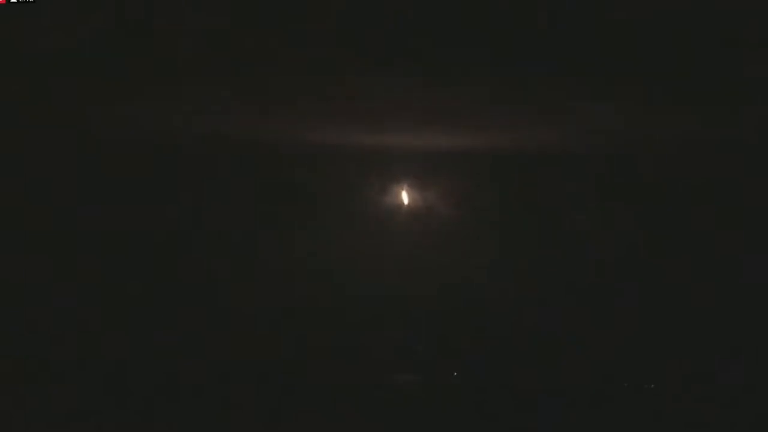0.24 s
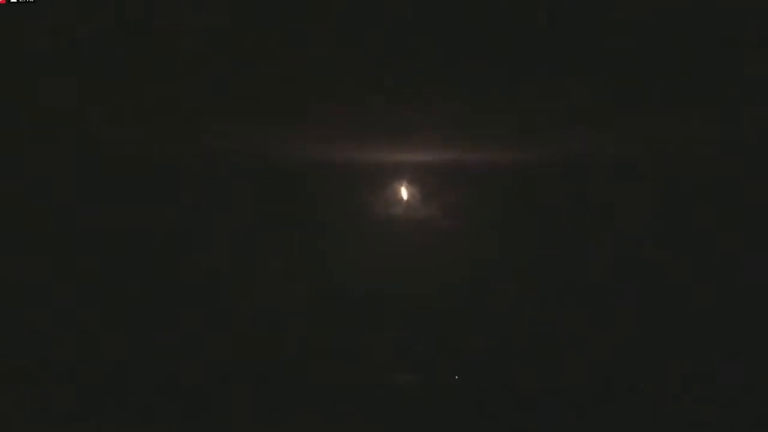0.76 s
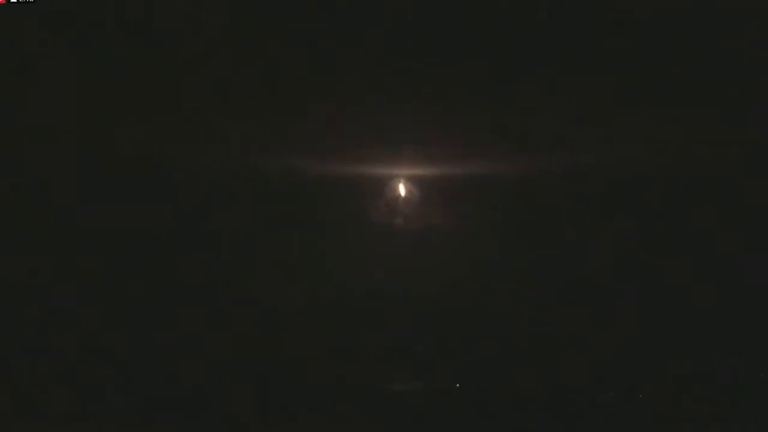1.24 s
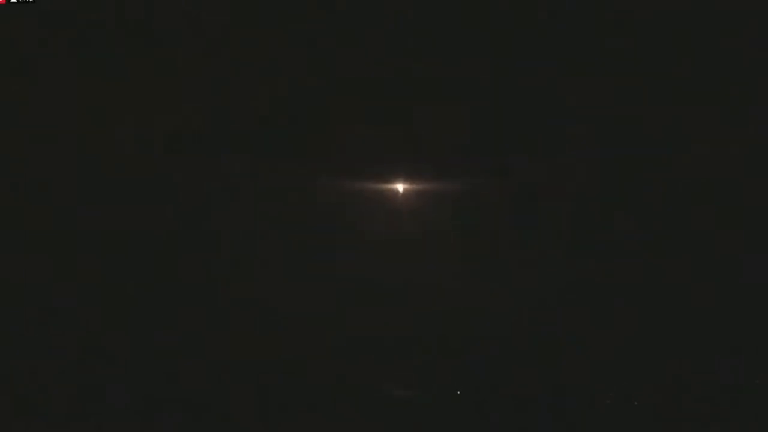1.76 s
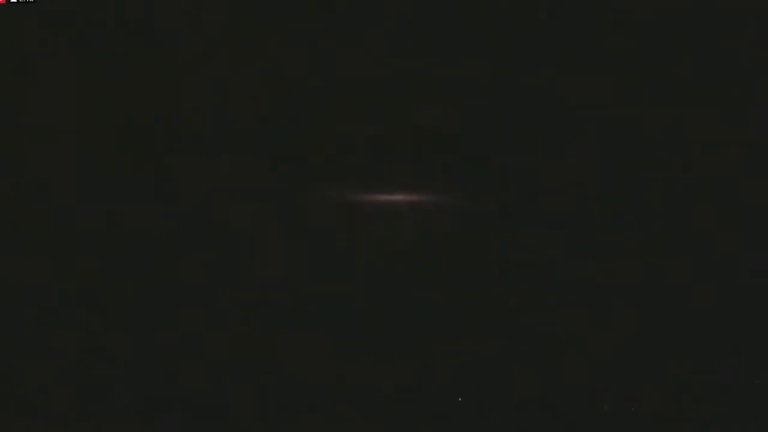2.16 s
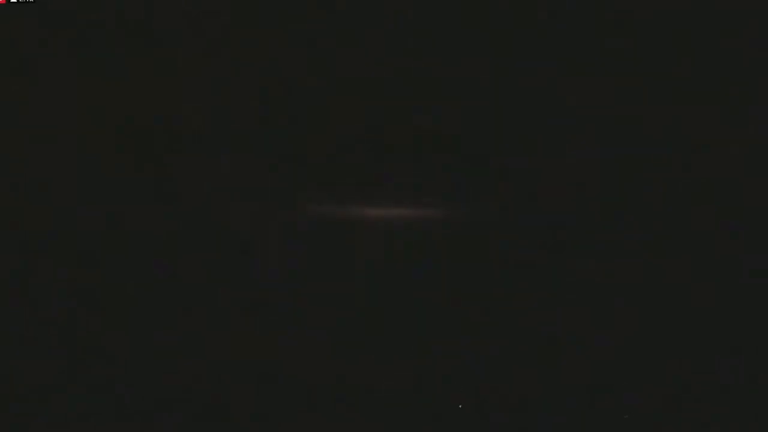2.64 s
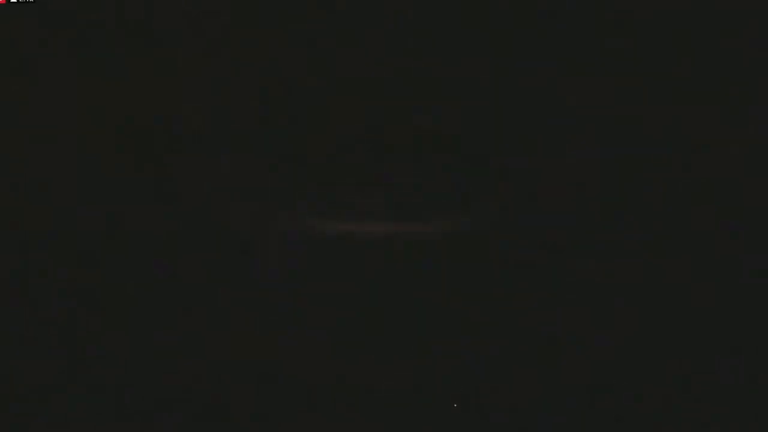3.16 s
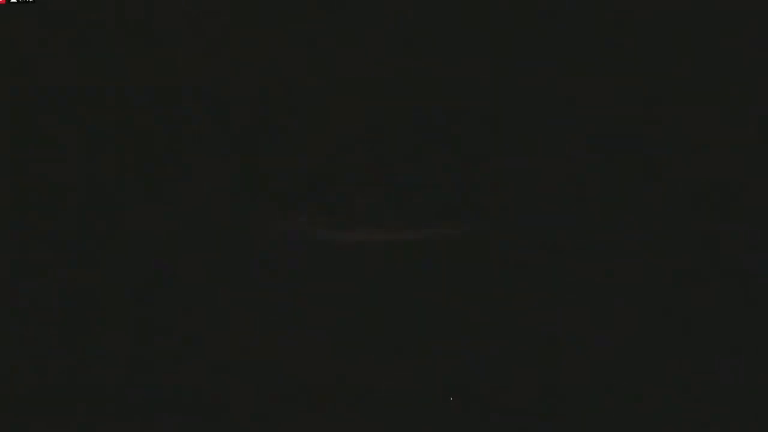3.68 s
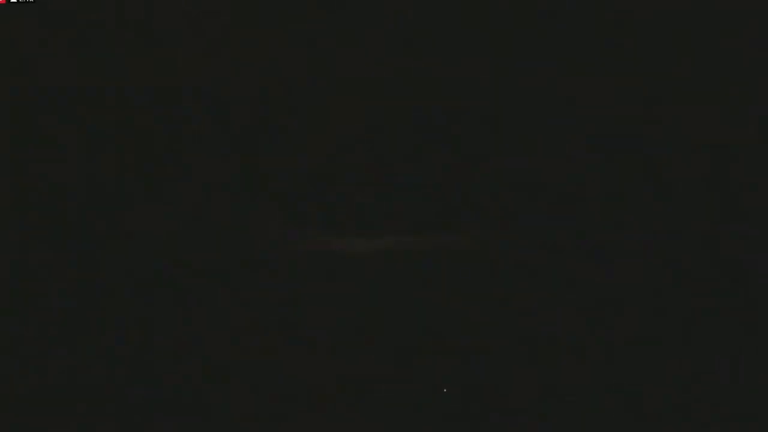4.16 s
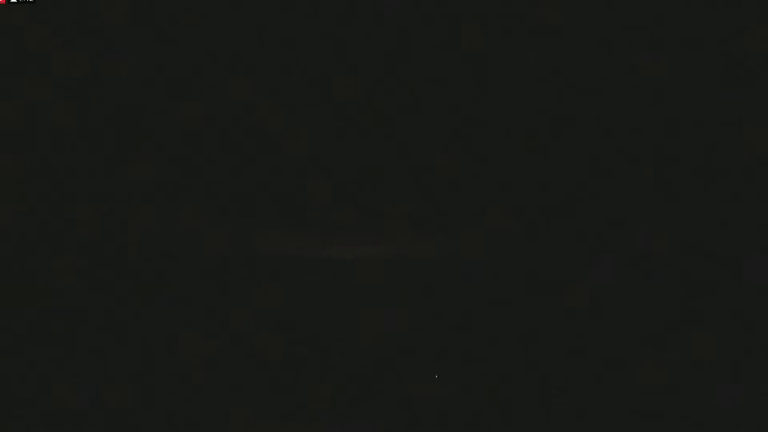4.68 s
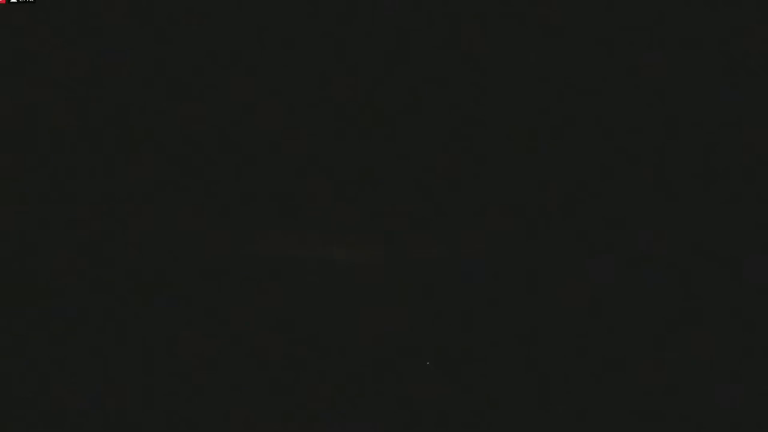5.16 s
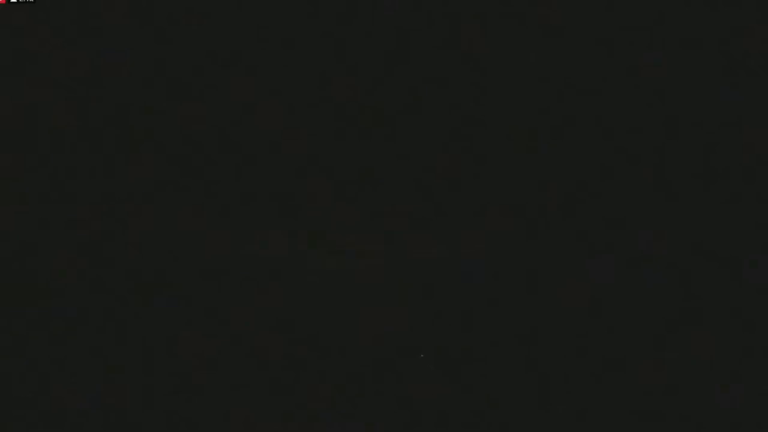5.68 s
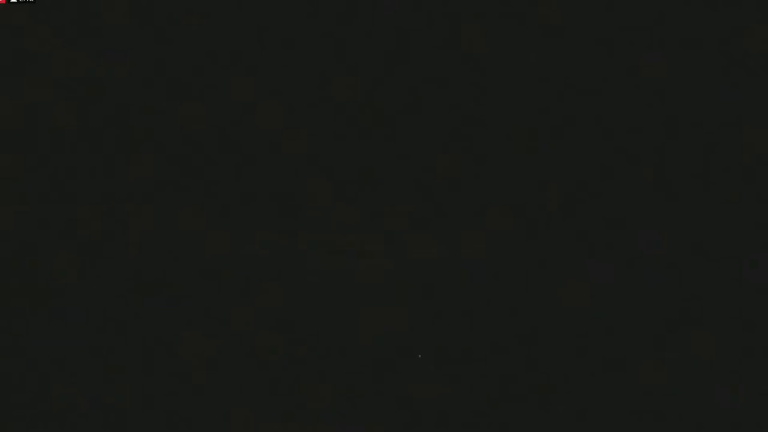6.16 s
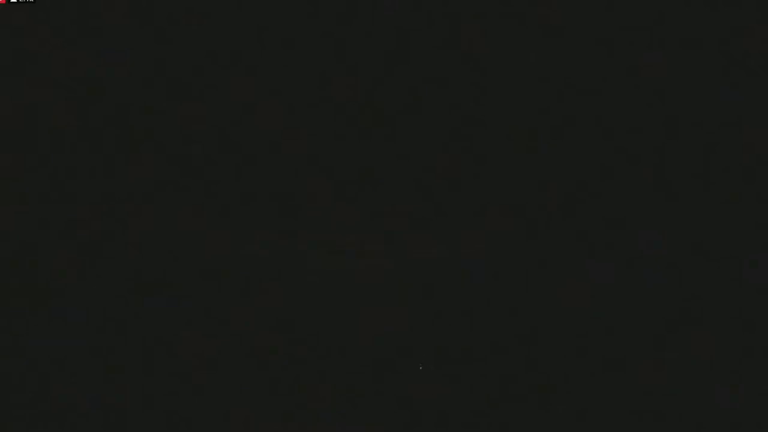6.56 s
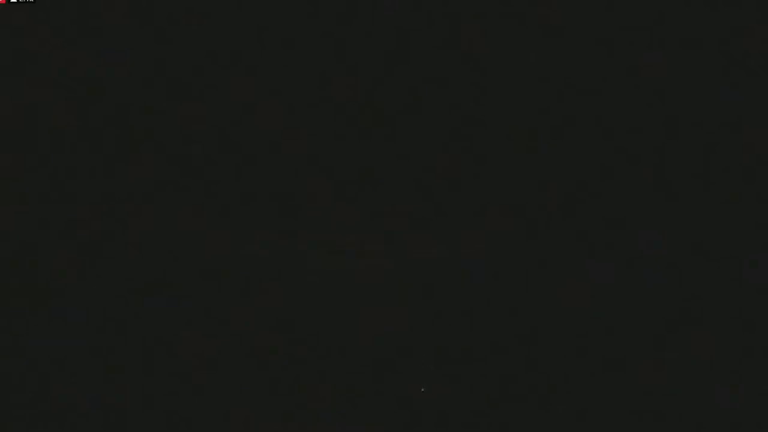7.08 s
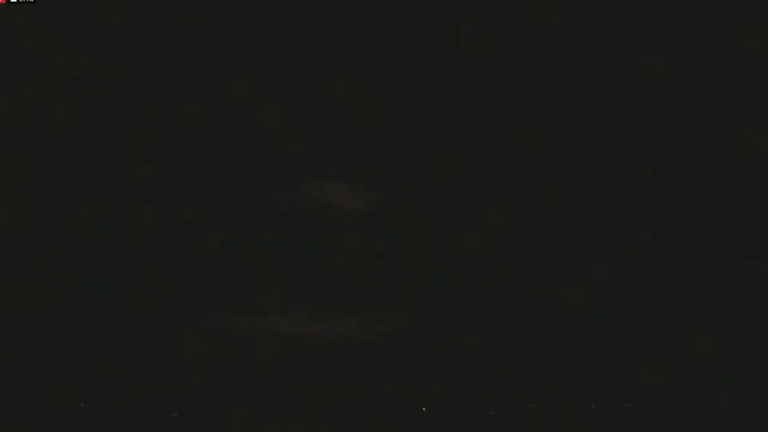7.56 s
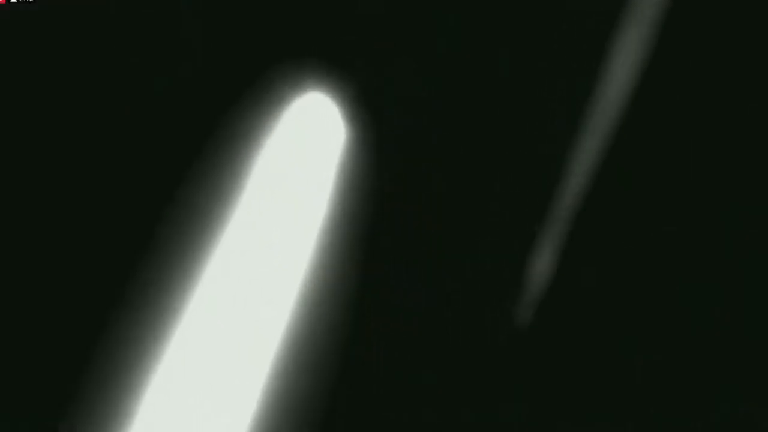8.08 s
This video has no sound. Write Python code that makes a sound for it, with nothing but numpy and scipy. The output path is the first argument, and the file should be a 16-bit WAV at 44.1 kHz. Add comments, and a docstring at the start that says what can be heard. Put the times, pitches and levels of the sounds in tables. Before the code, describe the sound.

Outdoors at night, a far rocket motor rumbles low and uneven, growing steadily until the end. Near the microphone, a thin, resonant roar and grainy rustle with small snaps come first, then three very faint high squeaks and sparse bright ticks. A katydid rasps one rapid buzzing phrase past the middle. Ticks, faint swishes and knocks return under the heaviest thumps.

```python
"""From the start a thin roar, noise shaped by the microphone's resonance, and a close rustle of grains and snaps.
A far solid rocket motor climbs into the night: noise and thumps of a few cycles make a lumpy, growing rumble.
Dull knocks, three squeaks (1.0-1.6 s), then swishes and ticks are tones, noise bands and struck resonances.
A katydid's wing resonances rasp one phrase (4.7-6 s) over hiss, a buzz of high partials and short sine pips.
Swishes, ticks and knocks return as the rumble grows to the end; faint even hiss and two whines never stop."""
import sys
import numpy as np
from scipy import signal
from scipy.io import wavfile
from scipy.ndimage import uniform_filter1d

SR = 44100
rng = np.random.default_rng(int(sys.argv[2]) if len(sys.argv) > 2 else 0)


def wav_out(sig):
    """Save sig, one row per channel (or a flat mono array), as 16-bit PCM at SR to the path in sys.argv[1]."""
    wavfile.write(sys.argv[1], SR, np.round(np.clip(np.atleast_2d(sig).T, -1, 1) * 32767).astype(np.int16))


N = 367353
TIME = np.arange(N) / SR

# Upper limits of the three lower frequency ranges of the rumble: f/Hz
RANGE_TOPS_HZ = 60, 125, 260
# Range levels of the jet noise: t/s, then level/dB of 60-125 Hz, below 60 Hz, 125-260 Hz, above 260 Hz
RUMBLE_LEVELS = [(0, -52, -61, -50.5, -58.5), (0.3, -51.5, -50, -51, -54), (0.5, -45, -39, -41.5, -51),
                 (0.9, -34, -41.5, -42, -53.5), (1.4, -39.5, -47, -44, -48), (1.9, -39, -40.5, -40, -50.5),
                 (2.4, -44.5, -38, -43, -50), (2.8, -35.5, -39.5, -42.5, -45.5),
                 (3.3, -37.5, -42.5, -39, -49), (3.8, -42.5, -41.5, -39, -51),
                 (4.3, -36.5, -36.5, -38.5, -48.5), (4.65, -37, -38, -37, -47), (4.8, -30, -38, -38.5, -47),
                 (5.3, -35, -36.5, -37.5, -47.5), (5.55, -36, -43, -43, -47.5),
                 (5.95, -31.5, -35, -38.5, -49), (6.45, -37.5, -39, -38.5, -51.5),
                 (6.8, -30, -31.5, -35.5, -43), (7.1, -25.5, -30.5, -41.5, -45),
                 (7.5, -26, -37, -32.5, -46), (7.9, -25.5, -32, -35, -43.5), (8.33, -25.5, -30, -29, -44.5)]
# Spectral density of the jet noise: f/Hz, relative level/dB
RUMBLE_SPECTRUM = [(13, -36), (22, -10), (59, 0.5), (102, -7.5), (185, -4.5), (212, -13.5), (256, -18.5),
                   (395, -25.5), (462, -28), (900, -57.5), (1170, -70.5), (1980, -120)]
# Heaviest pressure lumps: centre t/s, peak level/dB, f/Hz
THUMPS = [(0.566, -36, 305), (0.683, -38, 226), (0.719, -38, 381), (0.893, -37, 66.4), (1.05, -30, 157),
          (1.109, -30, 159), (1.367, -34, 310), (1.643, -25.5, 210), (2.021, -28.5, 188),
          (2.148, -28.5, 140), (2.23, -30, 185), (2.264, -37, 360), (2.759, -27, 47.3), (2.821, -27, 134),
          (2.916, -38, 269), (3.085, -27.5, 93), (3.161, -32, 340), (3.389, -23, 80), (3.45, -25.5, 180),
          (3.661, -32.5, 318), (4.234, -29, 228), (4.459, -28, 189), (4.743, -19.5, 62), (4.809, -24, 55),
          (4.829, -21, 110), (4.882, -21.5, 149), (5.107, -23.5, 59.8), (5.14, -26, 222),
          (5.247, -19, 124.7), (5.301, -23, 77.4), (5.381, -22, 105), (5.561, -33, 388), (5.96, -29, 58.4),
          (6.048, -27, 112), (6.744, -38, 320), (6.837, -24, 189), (6.982, -27.5, 226), (7.041, -17.5, 109),
          (7.2, -22.5, 57), (7.304, -38, 396), (7.316, -26, 54), (7.625, -30.5, 381), (7.644, -27, 219),
          (7.765, -35, 350), (7.872, -16, 112), (7.932, -16, 113), (8.065, -10.5, 85), (8.106, -23.5, 211),
          (8.184, -15, 99)]
THUMP_CYCLES = 4.03
THUMP_TAKEOVER = 0.45   # share of its range's noise that a thump replaces at its crest (0-1)
RUMBLE_EVENNESS, LUMP_S = 0.46, 0.062   # share of the noise's own lumps removed (0-1), averaging length
GROWL_FLICKER_DB = 1.5   # the top range follows the roar's flicker
STEEPENING_S = 0.0015   # advance of a crest of amplitude 1


def rumble(flicker, lumps_db):
    """Nonlinear propagation: jet noise after miles of air steepens, as crests travel faster than troughs."""
    ranges = np.zeros((4, N))
    white = rng.standard_normal((2, N))
    for hz, band in bands(white, RUMBLE_SPECTRUM, patchy_db=2.5, patch_rate=5.1):
        ranges[np.searchsorted(RANGE_TOPS_HZ, hz)] += band

    deep_db, ground_db, chest_db, growl_db = in_time(RUMBLE_LEVELS)
    growl_db = growl_db + lumps_db + GROWL_FLICKER_DB * flicker
    levels_db = [ground_db, deep_db, chest_db, growl_db]   # from the lowest range up
    ranges = [from_db(level_db) * evened(part, RUMBLE_EVENNESS, LUMP_S)
              for level_db, part in zip(levels_db, ranges)]

    thumps, taken = np.zeros(N), np.zeros((4, N))
    for centre, peak_db, hz in THUMPS:
        length = THUMP_CYCLES / hz
        turn = np.arange(round(length * SR)) * hz / SR
        swell = np.sin(np.pi * turn / THUMP_CYCLES) ** 2
        wave = np.sin(2 * np.pi * (turn + rng.random()))
        add(thumps, centre - length / 2, from_db(peak_db) * swell * wave)
        add(taken[np.searchsorted(RANGE_TOPS_HZ, hz)], centre - length / 2, swell)

    noise_share = 1 - np.clip(THUMP_TAKEOVER * taken, 0, 1)
    pressure = thumps + np.sum(ranges * noise_share, axis=0)
    return np.interp(TIME + STEEPENING_S * pressure, TIME, pressure)


# Level of the roar: t/s, level/dB of the upper half, level/dB of the lower half relative to the upper
ROAR_LEVELS = [(0, -60.5, -2), (0.16, -60.5, -4), (0.4, -54.5, -4.5), (0.56, -50.5, -4.5), (0.63, -41, -4),
               (0.76, -49.5, -3.5), (1.1, -52, -1.5), (1.5, -56, -2), (1.95, -58, 0), (2.35, -58, -2),
               (2.75, -55, 0), (3.0, -58.5, 0.5), (3.9, -60, 0.5), (4.7, -58, 2), (5.2, -58.5, 5.5),
               (5.65, -60.5, 4), (5.95, -63, 3), (6.42, -65.5, 4.5), (6.8, -56.5, 1.5), (7.3, -59.5, 1.5),
               (7.7, -60.5, 3), (8.3, -60.5, 2.5)]
# Spectral density of the roar: f/Hz, relative level/dB
ROAR_SPECTRUM = [(520, -2), (640, -1.5), (1000, -4), (1300, -3), (1800, -6), (2330, 1), (2940, -2.5),
                 (3700, -20.5), (4300, -21.5), (5200, -28)]
# Brief Gaussian flares (positive) and dips (negative): centre t/s, level change/dB, half-width t/s (to 1/e)
FLARES = [(.14, 4, 0.018), (0.433, 4.5, 0.035), (0.635, -6, 0.023), (1.27, 6, 0.0091), (1.382, 3, 0.025),
          (1.59, -2.5, 0.012), (1.848, 5, 0.052), (2.398, 5.5, 0.0098), (2.473, 7, 0.0049),
          (2.552, 3, 0.013), (2.647, 6, 0.0057), (2.717, 4, 0.017), (2.824, 5, .012), (3.24, 4, 0.012),
          (5.032, 4.5, 0.016), (5.13, 4, .02), (5.25, 4.5, 0.022), (5.56, 3.5, 0.029), (6.039, 11, 0.02),
          (7.29, 4.5, 0.021), (7.65, 2.5, 0.047), (7.895, 1.5, .015), (8.055, 3.5, 0.014)]
ROAR_SPLIT_HZ, ROAR_FLICKER_DB = 1900, 1.18
MIC_HZ, MIC_WIDTH_HZ, MIC_EDGE_HZ = 2690, 480, 3350   # the resonance and the steep fall above it
MIC_DB, MIC_FLUTTER_DB = 9, 1.2   # resonance gain over the direct noise, and its chance variation


def roar(flicker, lumps_db):
    """Resonant transduction: the upper half of the noise excites the microphone's resonance."""
    upper_db, lower_db = in_time(ROAR_LEVELS)
    flares_db = sum(db * np.exp(-((TIME - s) / half_width) ** 2) for s, db, half_width in FLARES)
    halves = np.zeros((2, N))
    white = rng.standard_normal((2, N))
    for hz, band in bands(white, ROAR_SPECTRUM, patchy_db=1.1, patch_rate=12.0):
        halves[int(hz > ROAR_SPLIT_HZ)] += band

    lower = from_db(lower_db + lumps_db) * rms_one(halves[0])
    mic_gain = from_db(MIC_DB + MIC_FLUTTER_DB * drift(45.0))
    ringing = mic_gain * resonance(halves[1], MIC_HZ, MIC_WIDTH_HZ)
    upper = rms_one(dulled(halves[1] + ringing, leak_db=-6.0))
    return from_db(upper_db + flares_db + ROAR_FLICKER_DB * flicker) * (lower + upper)


# Level of the rustle: t/s, level/dB
RUSTLE_LEVELS = [(0, -75), (.4, -70.5), (.58, -67), (.63, -54), (.74, -68.5), (1.3, -69.5), (1.46, -72),
                 (1.51, -70), (1.58, -75), (1.9, -88), (2.35, -88), (2.52, -76), (2.76, -102), (5.9, -100),
                 (6.4, -78.5), (6.75, -95), (7.1, -77.5), (7.38, -82.5), (7.68, -97.5), (8.33, -76)]
# Spectral density of rustle and hiss: f/Hz, relative level/dB
RUSTLE_SPECTRUM = [(2120, -30.5), (3600, 1.5), (5440, -5.5), (6500, -4.5), (12000, -17.5), (13700, -27),
                   (15000, -27.5)]
RUSTLE_ROUGH_DB, HISS_ROUGH_DB = 2.2, -0.6   # the hiss varies less, and against the grains
HISS_DB, HISS_FOLLOWS = -64, 0.71   # level at full effort; share of the effort's swing
HISS_FADE_S = 0.08


def rustle_and_hiss(flicker):
    """Amplitude modulation: dense grains roughen the rustle; a smoother hiss lies under the katydid."""
    white = rng.standard_normal((2, N))
    noise = sum(band for hz, band in bands(white, RUSTLE_SPECTRUM, patchy_db=2.5, patch_rate=30.0))
    grains = flicker + 0.49 * drift(300.0)
    roughness = rms_one(from_db(RUSTLE_ROUGH_DB * (grains + drift(200.0))))
    rustle = from_db(in_time(RUSTLE_LEVELS)[0]) * roughness

    effort_db, = in_time(PHRASE)
    singing = faded(PHRASE[0][0], PHRASE[-1][0], HISS_FADE_S)
    swing_db = HISS_FOLLOWS * (effort_db - effort_db.max())
    hiss = singing * from_db(HISS_DB + swing_db + HISS_ROUGH_DB * grains)
    return (rustle + hiss) * rms_one(noise)


# Resonances of the lesser snaps: f/Hz
SMALL_SNAP_HZ = 2700, 4400, 4900, 5400, 5560, 6400
SMALL_SNAPS_PER_S, SMALL_SNAP_DB, SMALL_SNAP_WIDTH_HZ = 370, -6, 1700   # level re the rustle


def small_snaps():
    """Random impulse excitation: each lesser snap strikes one of a few resonances, following the rustle."""
    struck = rng.random(N) < SMALL_SNAPS_PER_S / SR
    clicks = struck * from_db(4.5 * np.minimum(rng.exponential(1, N), 3))
    dealt = rng.integers(0, len(SMALL_SNAP_HZ), N)
    rings = sum(twice_resonant(clicks * (dealt == k) + 1e-18, hz, SMALL_SNAP_WIDTH_HZ)
                for k, hz in enumerate(SMALL_SNAP_HZ))
    return from_db(in_time(RUSTLE_LEVELS)[0] + SMALL_SNAP_DB) * rms_one(rings)


# Snaps in the rustle: t/s, peak level/dB of the ring, ring f/Hz
SNAPS = [(0.1183, -53, 5720), (0.2516, -54, 5340), (0.4094, -49, 5660), (0.436, -51, 5340),
         (0.482, -54, 5570), (0.5188, -52, 4930), (0.587, -48, 5150), (0.602, -55, 4700),
         (0.616, -45, 4400), (0.6225, -47, 4750), (0.636, -41.5, 5400), (0.643, -42, 5000),
         (0.672, -45, 4680), (0.7014, -47, 5400), (0.72, -49, 5000), (0.733, -53, 5000), (0.751, -53, 4440),
         (0.767, -48, 4900), (0.789, -48, 5200), (0.8107, -52, 4900), (0.8735, -51, 4740),
         (0.893, -53, 5260), (0.937, -55, 5000), (0.944, -54, 5300), (0.979, -56, 4600), (1.031, -58, 4520),
         (1.0522, -53, 5220), (1.1547, -53, 4960), (1.186, -53, 5400), (1.193, -47, 5070),
         (1.21, -57, 5770), (1.312, -54, 5450), (1.319, -60, 5600), (1.505, -55, 5200), (1.515, -56, 5600),
         (1.639, -61, 5300)]
JOLT_DB = 7.5   # peak of the microphone's resonance above that of the ring


def snaps():
    """Transient excitation: a narrow ring over a broad click jolts the microphone's resonance."""
    out = np.zeros(N)
    for s, peak_db, hz in SNAPS:
        ring = burst(hz, width_hz=1000, t60=0.0097)
        click = 0.31 * burst(8200, width_hz=8000, t60=0.0066)
        add(out, s, from_db(peak_db) * (ring + click))
        add(out, s, from_db(peak_db + JOLT_DB) * burst(MIC_HZ, MIC_WIDTH_HZ, t60=0.021))
    return out


# Bright ticks close by: touch t/s, reference level/dB, then level/dB of each of four rings re the reference
TICKS = [(2.5011, -56, -16, -15, -11, -18), (2.6389, -45, -15, -23, -16, -7),
         (2.9781, -46, -18, -19, -15, -16), (3.708, -43, -25, -26, -17, -12),
         (3.7652, -64, -14, -10, -18, -20), (3.9862, -30.5, -9, -29, -17, -19),
         (6.264, -47, -20, -19, -16, -18), (6.3061, -47, -14, -17, -12, -25),
         (6.4038, -58, -14, -4, -19, -20), (6.6191, -36.5, -25, -20, -19, -17),
         (7.0075, -47, -14, -12, -11, -26), (7.0792, -55, -15, -14, -17, -25),
         (7.4429, -39, -17, -13, -20, -37), (7.4716, -39, -14, -15, -20, -38),
         (7.5646, -55, -9, -16, -20, -25), (7.605, -55, -17, -8, -21, -24),
         (7.7756, -42.5, -12, -11.5, -26, -37), (8.2087, -38.5, -21, -21, -19, -17.5),
         (8.2864, -59, -16, -18, -15, -18), (7.4742, -40, -14, -17, -21, -38)]
# The four rings of a tick: f/Hz, bandwidth f/Hz
TICK_RINGS = [(4100, 970), (5450, 1200), (7900, 1800), (10500, 4500)]
TICK_T60_S, TICK_STRIKE = 0.0045, 3.6   # decay of the exciting noise; blow re that noise
TICK_LAG_S = 0.00057   # the rings answer a moment after the touch


def ticks():
    """Modal superposition: one touch sounds four broad, quickly damped rings of alternating sign."""
    out = np.zeros(N)
    for s, peak_db, *rings_db in TICKS:
        for k, (ring_db, (hz, width_hz)) in enumerate(zip(rings_db, TICK_RINGS)):
            gain = (-1) ** k * from_db(peak_db + ring_db)
            add(out, s + TICK_LAG_S, gain * burst(hz, width_hz, TICK_T60_S, TICK_STRIKE))
    return out


# Dull knocks close by: t/s, level/dB before dulling, centre f/Hz, bandwidth f/Hz, T60 of the exciting noise t/s
KNOCKS = [(.437, -37.5, 2600, 900, .025), (0.665, -37, 2600, 900, .025), (1.564, -37.5, 2630, 900, .02),
          (4.224, -42, 740, 500, 0.025), (5.124, -36.5, 2300, 1200, 0.011), (5.141, -37, 2550, 900, 0.009),
          (5.235, -37, 2200, 1600, 0.0096), (5.243, -48, 2500, 1200, .015), (5.863, -46, 2840, 450, .005),
          (5.9078, -40, 2750, 420, 0.004), (5.942, -41, 1200, 1600, .008), (6.027, -39, 850, 1000, 0.018),
          (6.032, -43, 1500, 1800, 0.018), (6.041, -40, 800, 900, 0.018), (6.047, -48, 2000, 1800, 0.018),
          (6.053, -45, 1900, 1800, 0.01), (7.615, -36.5, 600, 500, 0.068), (7.632, -36.5, 900, 500, 0.046)]


def knocks():
    """Impact excitation: a strong blow on a lower resonance, with little passing above the microphone's."""
    out = np.zeros(N)
    for s, peak_db, hz, width_hz, t60 in KNOCKS:
        add(out, s, from_db(peak_db) * dulled(burst(hz, width_hz, t60, strike=8.0), leak_db=-24))
    return out


# Effort of the katydid's phrase, before the wing's own gains: t/s, level/dB
PHRASE = [(4.75, -52.5), (4.89, -36.5), (4.96, -37), (5.06, -36.5), (5.3, -32.5), (5.51, -32.5),
          (5.72, -35.5), (5.8, -42), (5.93, -66)]
# Wing strokes within a syllable: start t/s, length t/s
STROKES = [(0, .0175), (.017, .022)]
# Wing resonances, lower on the first stroke: f/Hz, bandwidth f/Hz, level/dB first stroke, level/dB second stroke
WING = [(8720, 290, -3, -15), (9060, 490, -7, -6.5), (9160, 170, 0, -10), (9500, 390, -11, -1.5),
        (9770, 430, -10, -12), (10700, 900, -9.5, -9), (11740, 950, -15, -13), (13400, 1500, -21, -19)]
FIRST_SYLLABLE_S, SYLLABLE_PERIOD_S, SYLLABLE_COUNT = 4.745, 0.0693, 18
WING_FLOOR_HZ, WING_TOP_HZ = 8000, 14300   # the wing radiates little outside these
ECHO_DB, ECHO_T60_S, ECHO_HZ, ECHO_WIDTH_HZ = -12, 0.14, 9300, 2300   # foliage around the katydid


def katydid():
    """Stridulation: two wing strokes a syllable scrape the wing's resonances; foliage scatters echoes."""
    t, out = np.arange(5000) / SR, np.zeros(N)
    catch = from_db(3.6 * drift(500.0))   # the file's teeth catch unevenly
    for s in FIRST_SYLLABLE_S + SYLLABLE_PERIOD_S * np.arange(SYLLABLE_COUNT):
        peak_db = np.interp(s, *np.transpose(PHRASE)) + rng.normal(0, 0.58)
        for stroke, (start, length) in enumerate(STROKES):
            u = np.clip((t - start) / length, 0, 1)
            effort = np.sin(np.pi * u ** 0.75) ** 1.3   # swells and dies within the stroke
            teeth = rng.standard_normal(len(t)) * effort / effort.max()
            for hz, width_hz, *levels_db in WING:
                gain = from_db(peak_db + levels_db[stroke] + rng.normal(0, 1.8))
                add(out, s, gain * resonance(resonance(teeth, hz, width_hz), hz, width_hz * 2))

    radiated = signal.butter(4, [WING_FLOOR_HZ, WING_TOP_HZ], "band", fs=SR, output="sos")
    out = signal.sosfilt(radiated, out)
    t = np.arange(6000) / SR
    scatter = rng.standard_normal(len(t)) * from_db(-60 * t / ECHO_T60_S)
    foliage = resonance(scatter, ECHO_HZ, ECHO_WIDTH_HZ)
    foliage = foliage / np.sqrt(np.sum(foliage ** 2))
    return out * catch + from_db(ECHO_DB) * signal.fftconvolve(out, foliage)[:N]


# Spells of the thin buzz: start t/s, end t/s, level/dB
BUZZ_SPELLS = [(4.825, 4.875, -74), (4.895, 4.95, -72), (4.97, 5.025, -70), (5.135, 5.285, -70),
               (5.31, 5.43, -70), (5.45, 5.49, -70), (5.51, 5.76, -69)]
# Partials of the buzz: multiple of the pulse rate, relative level/dB
BUZZ_PARTIALS = [(124, -15), (125, -5), (126, -7), (127, -6), (128, 0), (129, -6), (130, -7), (131, -7)]
BUZZ_PULSE_HZ, BUZZ_FADE_S = 120, 0.011
BUZZ_HISS_DB, BUZZ_HISS_HZ, BUZZ_HISS_WIDTH_HZ = -4, 15300, 650   # breath around the partials


def buzz():
    """Fourier synthesis: neighbouring high harmonics of a pulse rate beat together, a little rough."""
    tone = sum(from_db(level_db) * np.cos(2 * np.pi * k * BUZZ_PULSE_HZ * TIME + 0.3 * (k - 128) ** 2)
               for k, level_db in BUZZ_PARTIALS)
    level = sum(from_db(db) * faded(start, end, BUZZ_FADE_S) for start, end, db in BUZZ_SPELLS)
    breath = twice_resonant(rng.standard_normal(N), BUZZ_HISS_HZ, BUZZ_HISS_WIDTH_HZ)
    mixed = rms_one(rms_one(tone) + from_db(BUZZ_HISS_DB) * rms_one(breath))
    return level * from_db(3.0 * drift(150.0)) * mixed


# Short pips: start t/s, f/Hz, level/dB
PIPS = [(4.912, 4210, -73), (4.975, 4170, -72), (5.07, 4150, -74), (5.335, 4130, -75), (5.65, 4200, -71),
        (5.7, 4140, -72), (5.0, 4150, -70), (5.038, 4140, -65), (5.235, 4200, -70), (5.304, 4120, -65),
        (5.36, 4100, -64), (5.365, 7181, -68), (5.41, 7181, -61), (5.414, 4130, -65), (5.48, 4130, -73),
        (5.54, 4200, -73), (5.62, 4100, -64), (5.672, 4130, -63), (5.722, 7181, -66), (5.73, 4140, -66),
        (5.79, 4140, -81)]
PIP_S, PIP_GLIDE_HZ = 0.025, 25   # length; spread of the chance slide to either side


def pips():
    """Gated sinusoids: short tones slide a little by chance under an arched envelope, roughened."""
    t, out = np.arange(round(PIP_S * SR)) / SR, np.zeros(N)
    envelope = np.sqrt(np.sin(np.pi * t / PIP_S))
    for s, hz, level_db in PIPS:
        glide_hz = PIP_GLIDE_HZ * rng.normal() * (t / PIP_S - 1)
        tone = np.sin(2 * np.pi * (hz + glide_hz) * t)
        add(out, s, np.sqrt(2) * from_db(level_db) * envelope * tone)
    return out * from_db(3.0 * drift(120.0))


# Three squeaks, each a pitch curve: t/s, f/Hz, level/dB
SQUEAKS = [
    [(1.03, 9800, -85), (1.06, 10250, -84), (1.1, 10400, -85), (1.14, 9800, -88)],
    [(1.22, 10700, -88), (1.26, 11100, -86), (1.29, 11300, -86), (1.31, 11000, -88)],
    [(1.48, 10900, -85), (1.51, 12000, -85), (1.55, 11450, -84), (1.605, 9600, -85)],
]
SQUEAK_WAVER_HZ = 50


def squeaks():
    """Frequency modulation: three faint near-pure tones rise and fall with a wavering pitch."""
    out = np.zeros(N)
    for rows in SQUEAKS:
        hz, level_db = in_time(rows)
        fade = faded(rows[0][0], rows[-1][0], 0.012)
        gain = np.sqrt(2) * from_db(level_db + 3.5 * drift(120.0))
        cycles = np.cumsum(hz + SQUEAK_WAVER_HZ * drift(150.0)) / SR
        out += fade * gain * np.sin(2 * np.pi * cycles)
    return out


# Faint airy swishes: start t/s, end t/s, f/Hz, bandwidth f/Hz, level/dB at the crest
SWISHES = [(7.15, 7.5, 6450, 300, -83), (7.72, 7.92, 6150, 600, -84), (6.2, 6.33, 9800, 600, -87),
           (2.45, 2.7, 8000, 700, -86)]


def swishes():
    """Narrow-band filtering: bands of noise swell and fade."""
    white, out = rng.standard_normal(N), np.zeros(N)
    for start, end, hz, width_hz, level_db in SWISHES:
        swell = np.sin(np.pi * np.clip((TIME - start) / (end - start), 0, 1))
        out += from_db(level_db) * rms_one(twice_resonant(white, hz, width_hz)) * swell
    return out


# Spectral density of the background hiss: f/Hz, relative level/dB
AIR_SPECTRUM = [(2650, -33.5), (4500, -2.5), (5420, -3), (6770, -6), (7870, -1), (12700, -4), (15000, -17)]
AIR_DB = -84
# Faint steady whines: f/Hz, rms level/dB
WHINES = [(5238, -94), (10508, -101)]


def air():
    """Stationary noise: the even hiss of the night and the preamplifier, with two thin whines."""
    white = rng.standard_normal((2, N))
    hiss = sum(band for hz, band in bands(white, AIR_SPECTRUM, patchy_db=0.3, patch_rate=20))
    whines = sum(np.sqrt(2) * from_db(level_db) * np.sin(2 * np.pi * hz * TIME) for hz, level_db in WHINES)
    return from_db(AIR_DB) * rms_one(hiss) + whines


def from_db(db):
    """Logarithmic level: decibels to amplitude gain."""
    return 10 ** (np.asarray(db) / 20)


def rms_one(x):
    """Normalisation by power: scale to rms 1."""
    return x / np.sqrt(np.mean(x ** 2) + 1e-20)


def in_time(rows):
    """Linear interpolation: the columns of a curve at every sample."""
    s, *columns = np.transpose(rows)
    return [np.interp(TIME, s, column) for column in columns]


def faded(start, end, fade_s):
    """Linear gating: 1 between two times, with ramps inside them."""
    return np.clip(np.minimum(TIME - start, end - TIME) / fade_s, 0, 1)


def add(out, s, sound):
    """Superposition: mix a short sound in at time s."""
    i = round(s * SR)
    out[i:i + len(sound)] += sound[:N - i]


def drift(rate):
    """Low-pass random process: noise through two one-pole filters with corner `rate` in Hz, rms 1."""
    r = np.exp(-40 * np.pi * rate / SR)   # computed at every 20th sample
    slow = signal.lfilter([1], [1, -2 * r, r * r], rng.standard_normal(N // 20 + 4002))[4000:]
    return np.interp(np.arange(N) / 20, np.arange(len(slow)), rms_one(slow))


def resonance(x, hz, width_hz):
    """Damped oscillator: a two-pole resonance with gain 1 at its peak."""
    r = np.exp(-np.pi * width_hz / SR)
    numerator = np.array([1, 0, -1]) * (1 - r * r) / 2
    return signal.lfilter(numerator, [1, -2 * r * np.cos(2 * np.pi * hz / SR), r * r], x)


def twice_resonant(x, hz, width_hz):
    """Cascaded resonance: the same oscillator twice in series gives steeper skirts."""
    return resonance(resonance(x, hz, width_hz), hz, width_hz)


def bands(white, spectrum, patchy_db, patch_rate):
    """Third-octave analysis: yields (f/Hz, band), each band with its own level and flicker."""
    hz_points, db_points = np.transpose(spectrum)
    octaves = np.log2(min(hz_points[-1], 16000) / hz_points[0])
    edges = hz_points[0] * 2 ** np.arange(0, octaves + 1 / 3, 1 / 3)
    for k, (low, high) in enumerate(zip(edges, edges[1:])):
        hz = np.sqrt(low * high)
        band_pass = signal.butter(2, [low, high], "band", fs=SR, output="sos")
        band = signal.sosfilt(band_pass, white[k % 2])   # neighbours take different noises
        level_db = np.interp(np.log(hz), np.log(hz_points), db_points)
        yield hz, band * from_db(level_db + patchy_db * drift(patch_rate))


def evened(x, share, seconds):
    """Envelope compression: take part of a noise's own swell out, so that the level curve leads."""
    length = round(seconds * SR)
    swell = uniform_filter1d(uniform_filter1d(x * x, length), length)
    return rms_one(x / (swell + 1e-12) ** (np.clip(share, 0, 1) / 2))


def dulled(x, leak_db):
    """Low-pass response: little passes above the microphone's resonance, save a leak of the whole."""
    low = signal.sosfilt(signal.butter(5, MIC_EDGE_HZ, fs=SR, output="sos"), x)
    return low + from_db(leak_db) * x


def burst(hz, width_hz, t60, strike=0):
    """Struck resonance: a blow and a dying puff of noise, twice through one resonance, peak 1."""
    t = np.arange(4000) / SR
    push = rng.standard_normal(4000) * from_db(-60 * t / max(t60, 0.002)) + strike * (t == 0)
    puff = twice_resonant(push, hz, width_hz)
    return puff / np.abs(puff).max()


# Instants at which roar, rustle, hiss, snaps, ticks and knocks cut out: centre t/s
GAPS = [0.16, .382, .39, 0.421, .472, .48, .498, 0.586, 0.652, .658, 0.687, 0.826, 0.835, 0.93, 1.125,
        1.176, 1.226, 1.24, 1.436, 1.555]
GAP_S, GAP_DB = 0.0013, -24   # half-width (to 1/e) and depth of one gap
SHARED_LUMP_DB = 0.9   # growl and the roar's lower half swell together


def scene():
    """Superposition of sources: the far rocket plus the sounds near the microphone."""
    gaps = from_db(GAP_DB * sum(np.exp(-((TIME - s) / GAP_S) ** 2) for s in GAPS))
    flicker = drift(83.0) + 0.22 * drift(32.0)
    lumps_db = SHARED_LUMP_DB * drift(22.0)
    high_pass = signal.butter(2, 500, "high", fs=SR, output="sos")
    touches = signal.sosfilt(high_pass, snaps() + ticks() + knocks())
    crackle = gaps * (roar(flicker, lumps_db) + rustle_and_hiss(flicker) + small_snaps() + touches)
    singers = katydid() + buzz() + pips() + squeaks()
    return (rumble(flicker, lumps_db) + crackle + singers + swishes() + air())[None]


CUTOFF_HZ = 15800


def record(dry):
    """Band limitation: a steep elliptic low-pass cuts the top."""
    return signal.sosfilt(signal.ellip(12, 0.5, 70, CUTOFF_HZ, fs=SR, output="sos"), dry)


dry = scene()
out = record(dry)
wav_out(out)
```